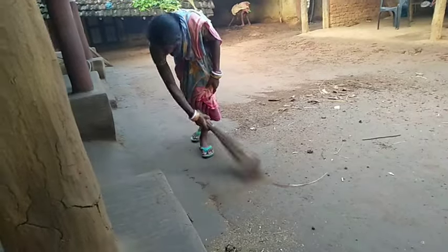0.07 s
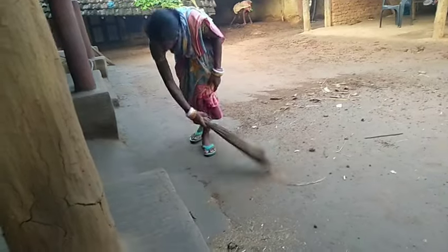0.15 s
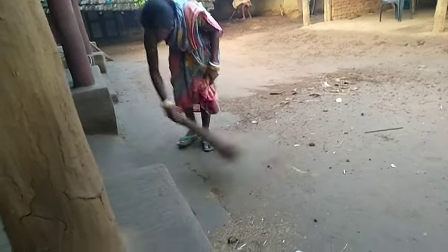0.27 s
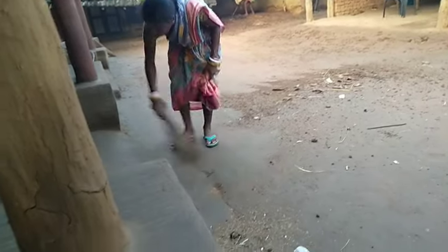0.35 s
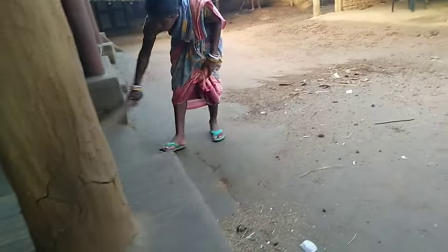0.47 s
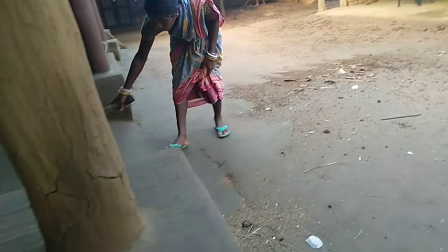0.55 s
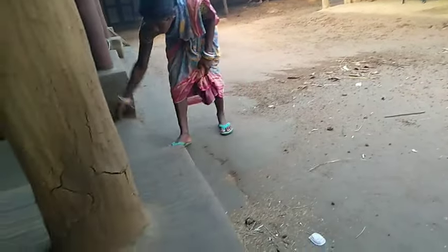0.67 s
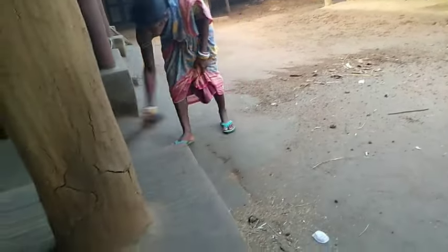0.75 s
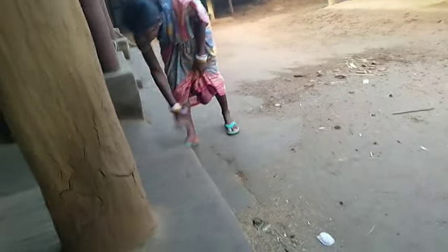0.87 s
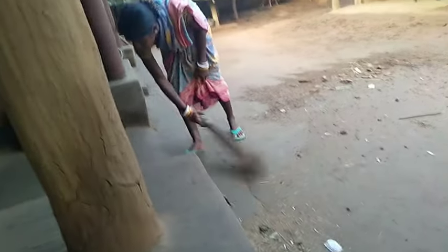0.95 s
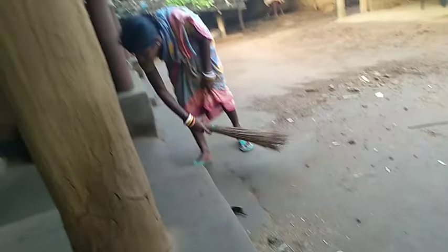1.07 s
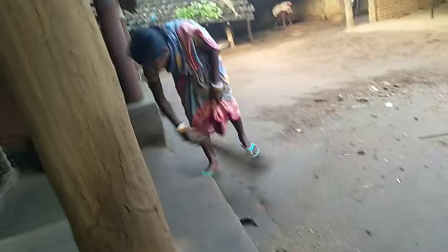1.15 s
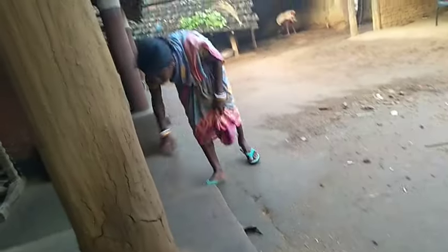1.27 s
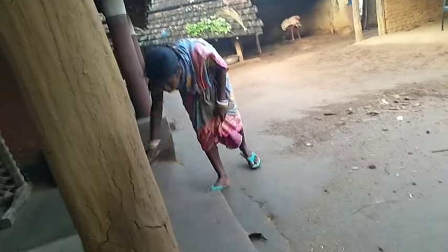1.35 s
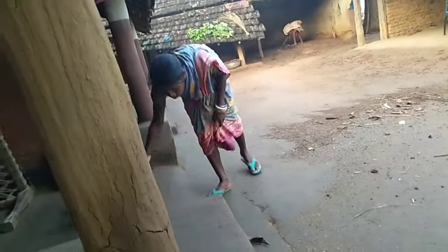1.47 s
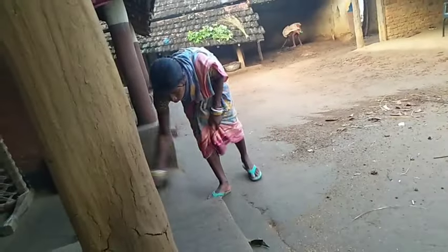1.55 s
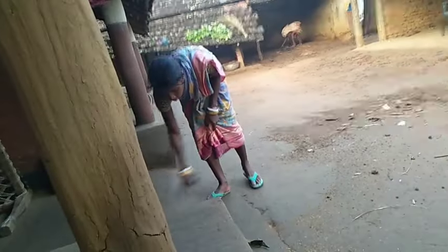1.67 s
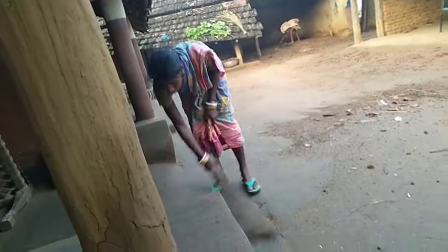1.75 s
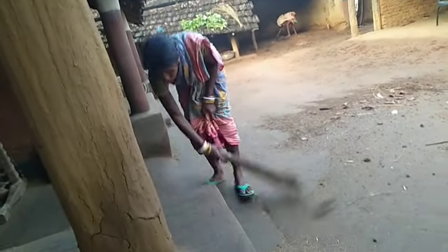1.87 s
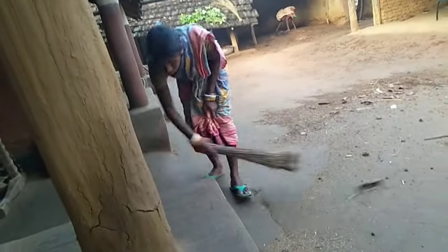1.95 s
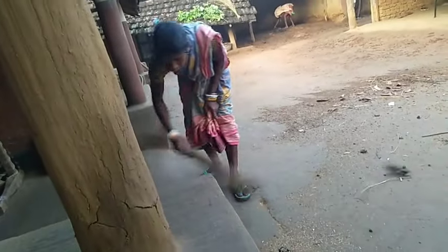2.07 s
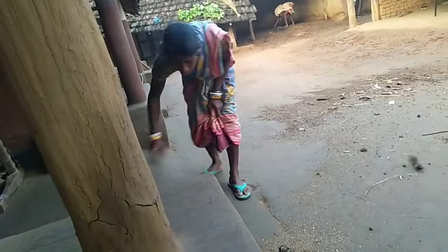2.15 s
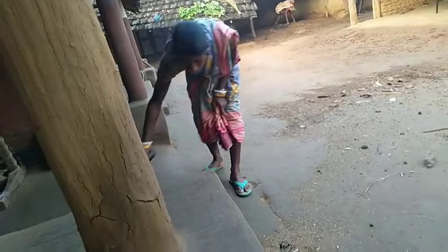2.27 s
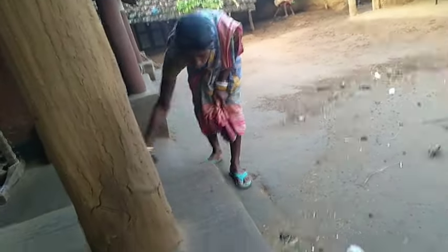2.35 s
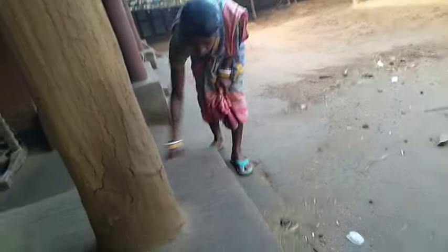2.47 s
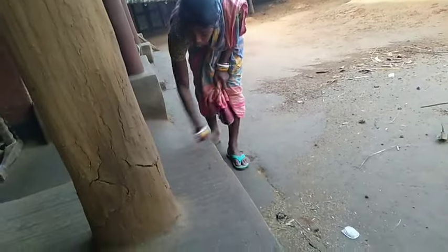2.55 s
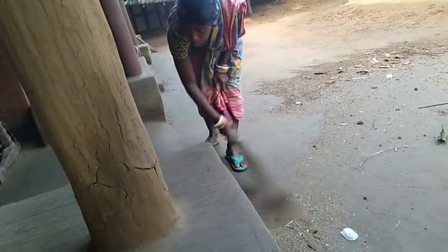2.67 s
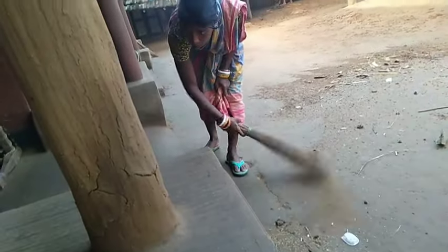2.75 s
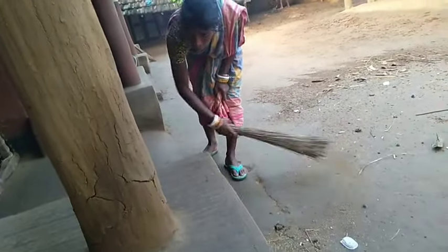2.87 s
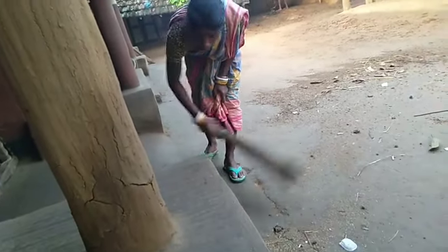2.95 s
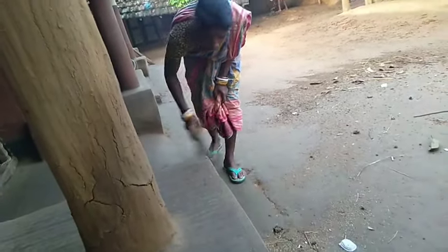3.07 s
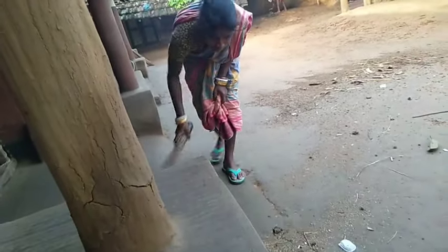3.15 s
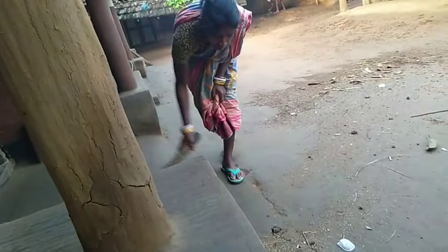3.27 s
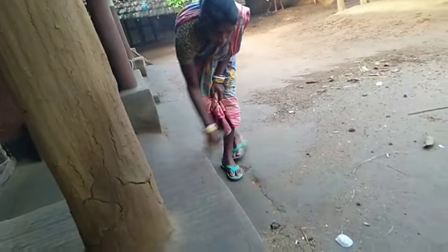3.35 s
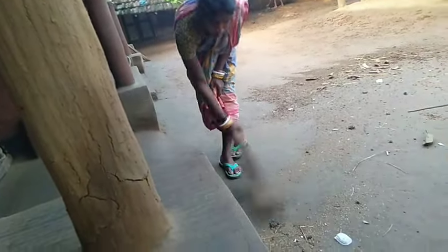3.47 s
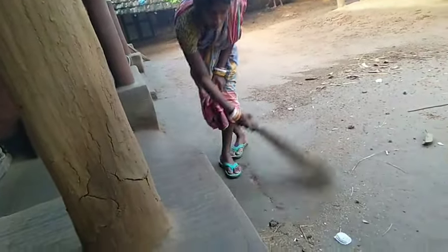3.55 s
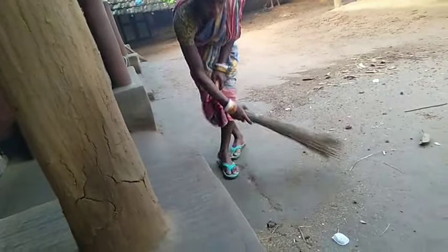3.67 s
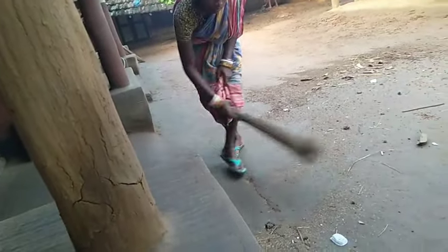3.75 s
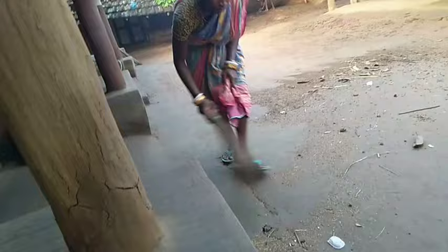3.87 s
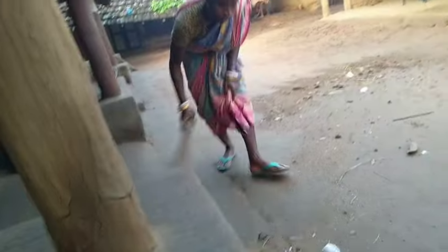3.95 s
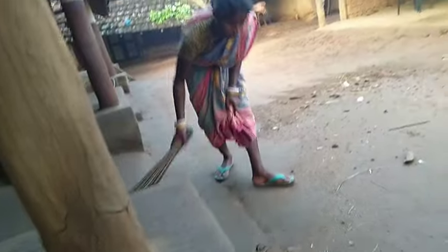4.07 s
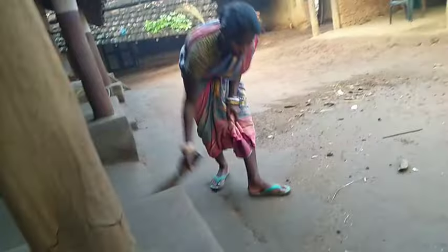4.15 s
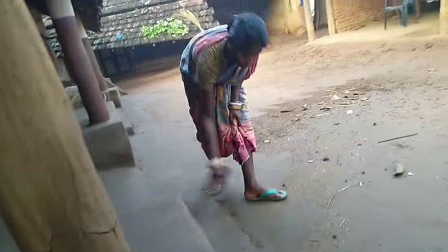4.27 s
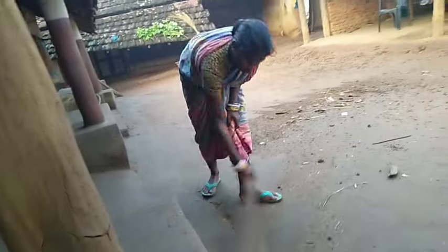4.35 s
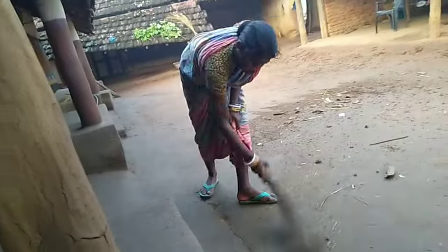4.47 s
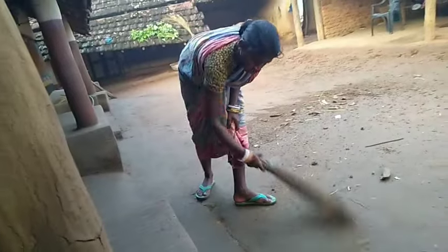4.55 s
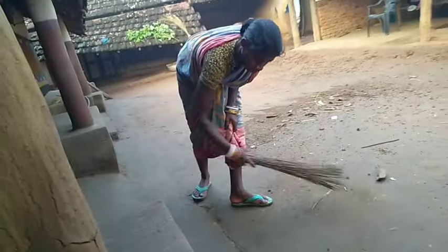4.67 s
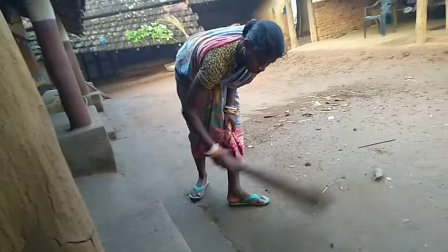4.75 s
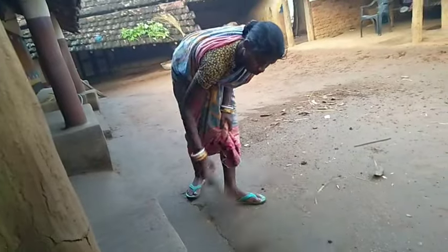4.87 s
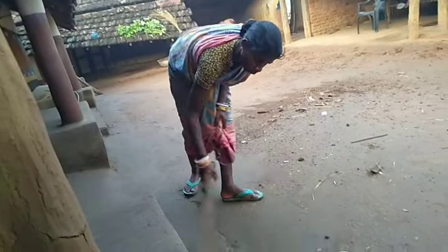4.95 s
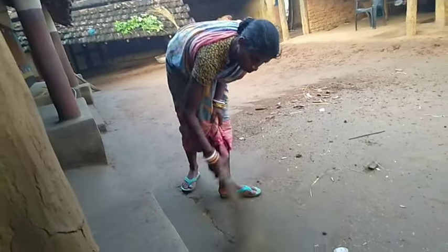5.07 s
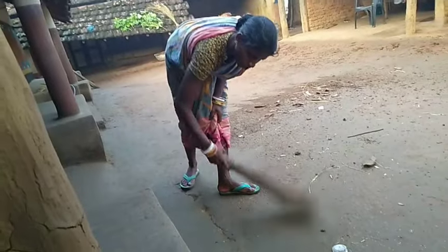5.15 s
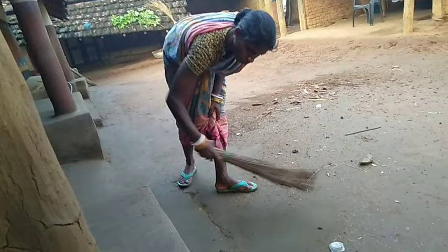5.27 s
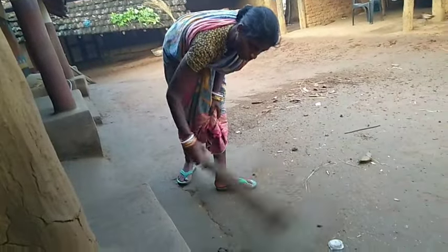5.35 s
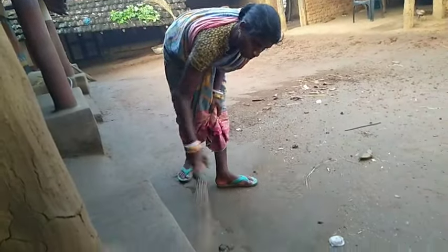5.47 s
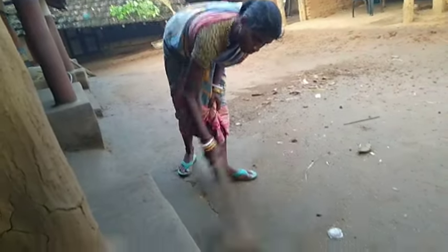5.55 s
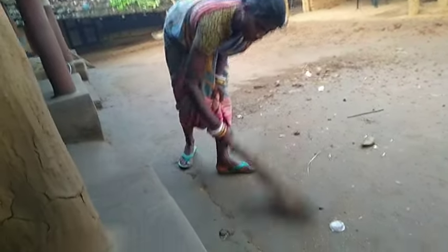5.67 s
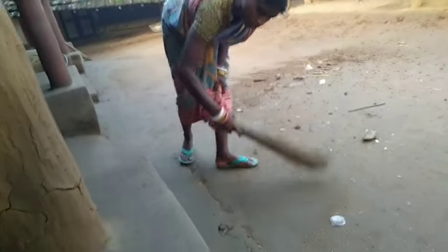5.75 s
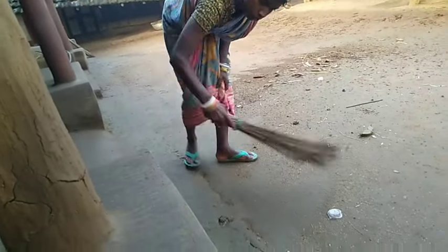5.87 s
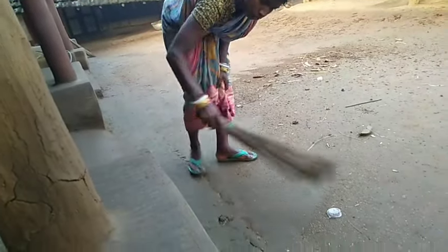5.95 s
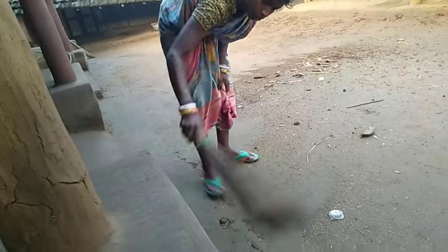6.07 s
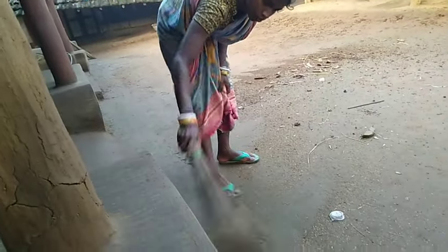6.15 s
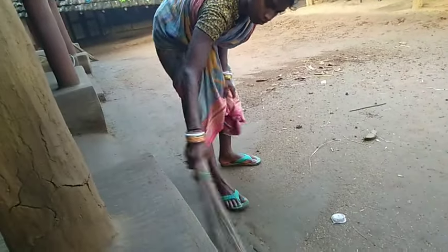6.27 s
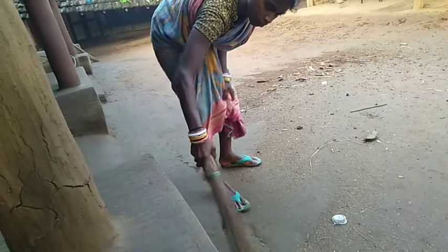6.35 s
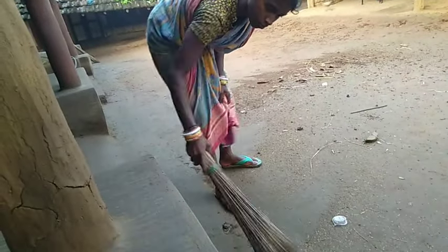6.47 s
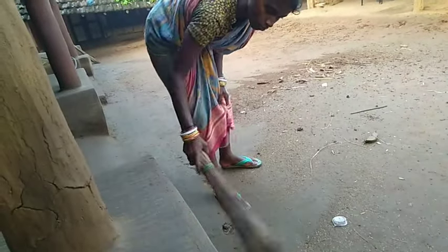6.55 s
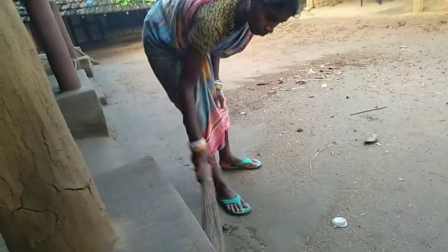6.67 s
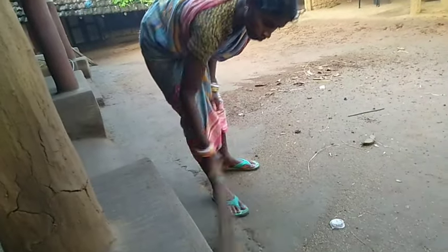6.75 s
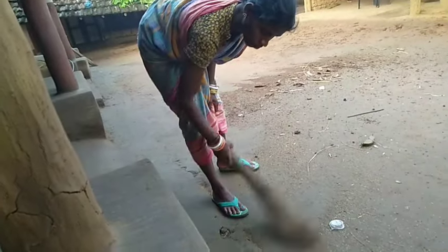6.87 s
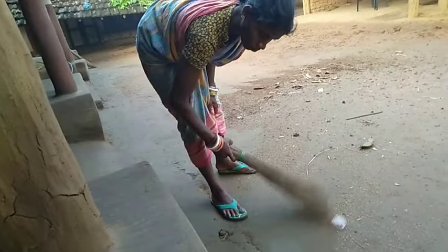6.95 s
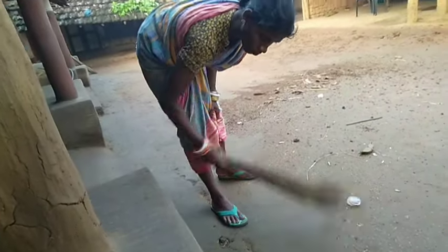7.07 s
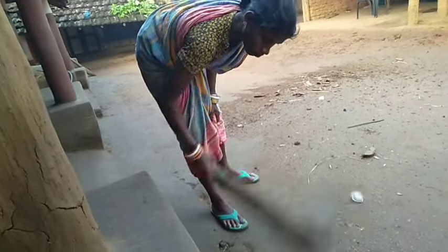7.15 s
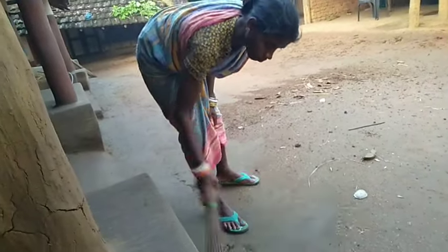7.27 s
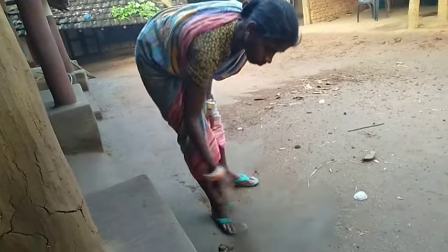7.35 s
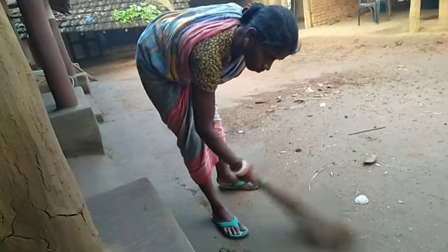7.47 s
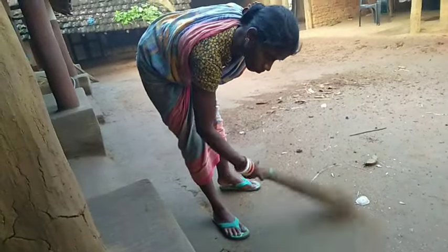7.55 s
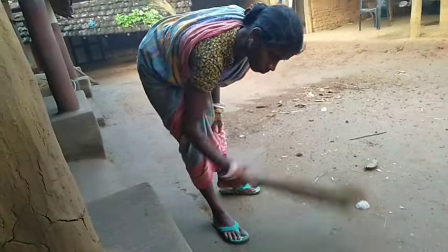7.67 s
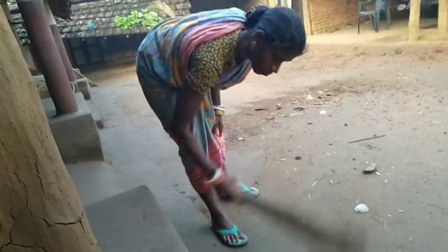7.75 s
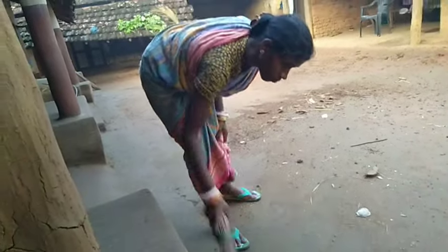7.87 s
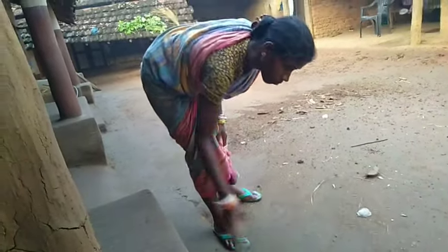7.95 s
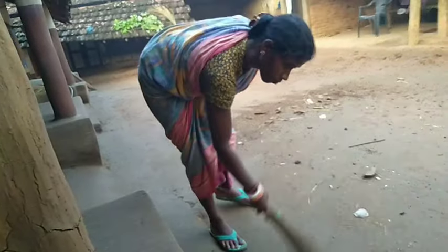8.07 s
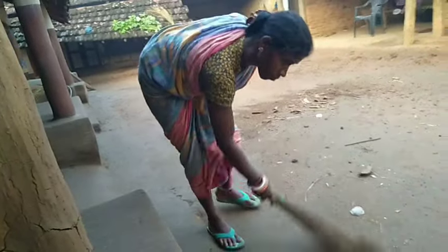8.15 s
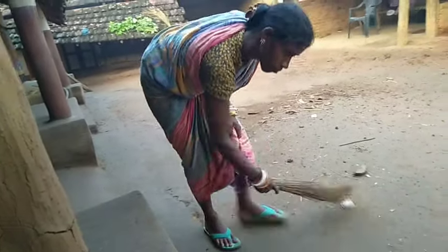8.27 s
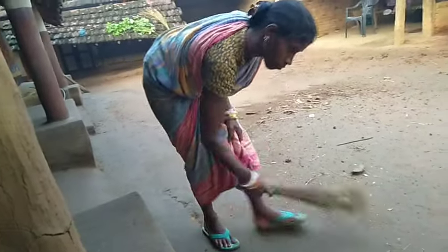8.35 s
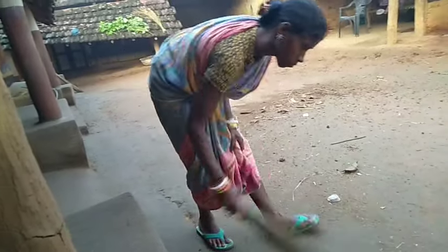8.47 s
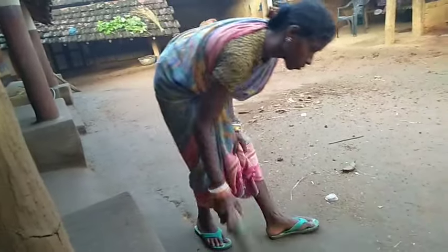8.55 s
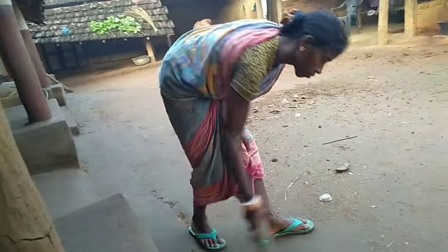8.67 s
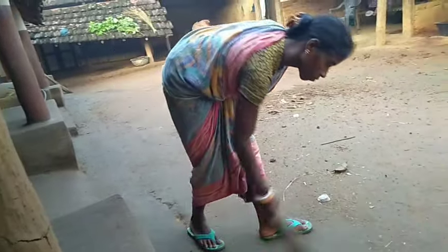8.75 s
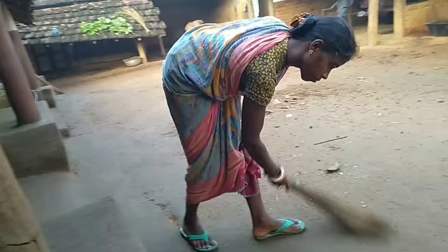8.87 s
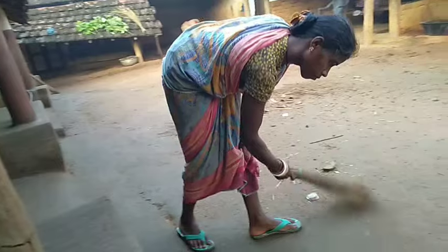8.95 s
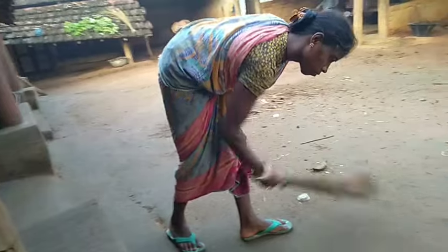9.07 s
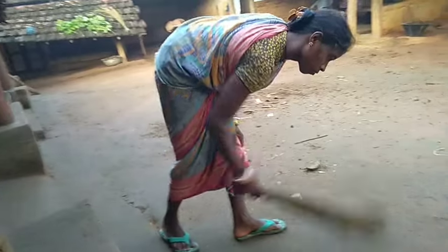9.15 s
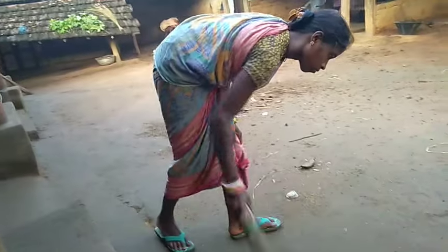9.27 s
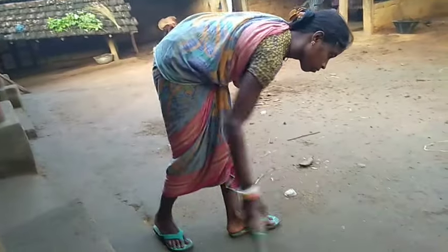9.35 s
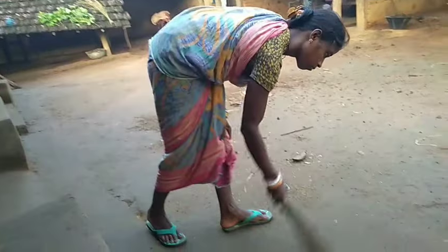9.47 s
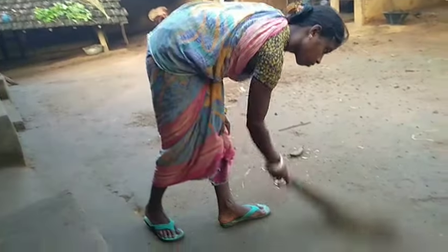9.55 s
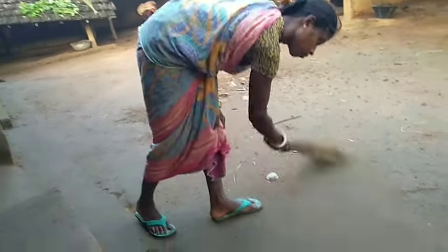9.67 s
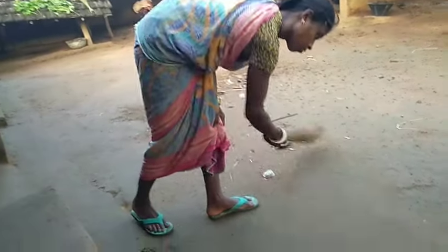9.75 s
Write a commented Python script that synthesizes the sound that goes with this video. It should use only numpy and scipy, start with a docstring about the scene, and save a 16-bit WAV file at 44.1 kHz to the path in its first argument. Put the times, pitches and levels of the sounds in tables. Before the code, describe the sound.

Rhythmic strokes of a bundle broom scrape over gritty earth outdoors, with falling bird whistles early on and a faint far-off motor.

```python
"""A packed-earth yard, swept with a short twig broom: strokes swell and fade as thousands of tips scratch grit,
and twigs sometimes slap or catch. Grit ticks, pebbles knock, something thuds softly. A bird gives five calls,
each a falling whistle ending on a held note, and fainter birds answer; now and then a bangle rings thinly near
3 kHz. Far off a small engine putters under a hiss of air. The sound is nearly mono, with stereo width only in
two treble bands."""
import sys
import numpy as np
from scipy import signal
from scipy.fft import rfft, irfft
from scipy.io import wavfile

SR = 44100
rng = np.random.default_rng(int(sys.argv[2]) if len(sys.argv) > 2 else 0)


def unload_audio(sound):
    """Save the sound as a 16-bit wav file, at the path given as the first command line argument."""
    columns = np.transpose(np.atleast_2d(sound))
    # keep every value between -1 and 1, then stretch to whole-number steps
    steps = np.round(np.clip(columns, -1, 1) * 32767)
    wavfile.write(sys.argv[1], SR, steps.astype(np.int16))


N = 433062
T = np.arange(N) / SR
HZ = np.maximum(np.arange(N // 2 + 1) * SR / N, 1)


def amp(db):
    """Decibels to gain."""
    return 10 ** (np.asarray(db) / 20)


def unit_rms(x):
    """Scale to unit rms."""
    return x / np.sqrt(np.mean(x ** 2) + 1e-20)


def curves(rows):
    """Each column after the first, interpolated linearly in time."""
    times_s, *columns = np.transpose(rows)
    return [np.interp(T, times_s, column) for column in columns]


def response(spectrum):
    """Gain per FFT bin from (Hz, dB) points on a log-frequency axis."""
    hz, db = np.transpose(spectrum)
    return amp(np.interp(np.log(HZ), np.log(hz), db))


def colour(x, spectrum):
    """Filter by (Hz, dB) points."""
    return irfft(rfft(x) * response(spectrum), N)


def drift(rate_hz):
    """Low-passed noise of unit rms."""
    r = np.exp(-2 * np.pi * rate_hz / SR)
    return unit_rms(signal.lfilter([1], [1, -2 * r, r * r], rng.standard_normal(N + SR))[SR:])


def gate(start_s, end_s, fade_s):
    """Window with linear fades."""
    return np.clip(np.minimum(T - start_s, end_s - T) / fade_s, 0, 1)


def ring(rows, t60_s, attack_s):
    """One damped sine per (start s, level dB, pitch Hz) row."""
    out = np.zeros(N)
    for start_s, level_db, hz in rows:
        start = int(start_s * SR)
        t = T[:min(N - start, SR // 2)]
        envelope = amp(level_db - 60 * t / t60_s) * (1 - np.exp(-t / attack_s))
        out[start:start + len(t)] += envelope * np.sin(2 * np.pi * hz * t)
    return out


# Each row: start in seconds, touchdown in seconds, landing level in dB, swell in seconds, peak in dB,
# drag in seconds, loss over the drag in dB, fade on lifting in dB per second, rolling grit in dB,
# low and middle bands in dB relative to the hiss.
STROKES = [(0.0, 0.00089, -25, 0.0086, -27, 0.051, 9, 90, -53.5, -0.5, -1.5),
           (0.699, 0.014, -54.5, 0.23, -33, 0.076, 1.5, 160, -52.5, 0, 1.5),
           (1.56, 0.086, -61.5, 0.23, -34.5, 0.093, -2.5, 232, -50.5, 2, 1.5),
           (2.45, 0.061, -54.5, 0.2, -35.5, 0.12, -0.5, 133, -57.5, 3.5, -1.5),
           (3.33, 0.036, -64.5, 0.15, -34, 0.064, -2.5, 127, -67, 3.5, -0.5),
           (4.23, 0.046, -51, 0.21, -33.5, 0.14, 7.5, 78, -65, 2.5, 0),
           (4.99, 0.0057, -50.5, 0.11, -36, 0.084, 1.5, 205, -57.5, 2.5, 0.5),
           (5.524, .012, -49, 0.17, -35.5, .02, 1.5, 137, -83, 3, 1),
           (6.244, 0.027, -38.5, 0.11, -44, 0.19, 12, 198, -63, 4, 2.5),
           (6.716, 0.011, -55.5, 0.23, -36.5, 0.05, 5, 118, -54, 6, 1.5),
           (7.329, 0.0071, -50.5, 0.19, -33, 0.13, 10, 191, -62, 2.5, 1),
           (7.96, 0.0058, -54.5, 0.2, -32.5, 0.1, 4, 131, -79, 2.5, -0.5),
           (8.729, 0.011, -44.5, 0.12, -31.5, 0.074, 0, 100, -55.5, 2.5, -1),
           (9.4, .02, -63, 0.19, -32.5, 0.062, -2, 117, -49, 4, -0.5)]
# Twigs slap down or catch. Each row: start in seconds, hiss level in dB, rise in seconds.
SLAPS = [(1.035, -33, 0.011), (1.22, -66, 0.018), (2.005, -49, .01), (2.075, -46, 0.013),
         (2.66, -34.5, 0.021), (2.772, -33.5, 0.0048), (4.445, -29.5, 0.016), (4.74, -53, 0.041),
         (4.82, -50, 0.025), (4.993, -36, 0.019), (5.5313, -38.5, 0.016), (6.2567, -42, 0.016),
         (6.42, -40.5, 0.017), (6.49, -45, .006), (6.35, -53, .01), (6.796, -34, 0.014),
         (7.0, -36.5, 0.0052), (7.3404, -39, 0.011), (7.47, -35, 0.0072), (7.9666, -37.5, 0.018),
         (8.3, -43, 0.012), (8.344, -39.5, .006), (8.668, -43.5, 0.03), (9.066, -38.5, 0.0055),
         (9.78, -44.5, 0.014)]


def contact_power():
    """Strokes land, swell, drag and lift; grit rolls on. Returns power of the hiss, low and middle."""
    swell_exponent, grit_fade_db_per_s = 1.74, 29.5
    low_dulling, middle_dulling = 0.25, 0.12   # dB over the hiss per dB under the peak
    bend_db_per_s = 11.5   # the scrape deepens as the twigs bend
    slap_bands_db = [[0], [-2], [-1.5]]
    power = np.full((3, N), 1e-16)
    for (start_s, touch_s, land_db, swell_s, peak_db, drag_s,
         loss_db, lift_db_per_s, grit_db, low_db, middle_db) in STROKES:
        start = int(start_s * SR)
        t = T[start:start + SR] - start_s
        lifted_s = np.maximum(t - swell_s - drag_s, 0)
        level_db = peak_db - (peak_db - land_db) * np.maximum(1 - t / swell_s, 0) ** swell_exponent
        level_db -= loss_db * np.clip((t - swell_s) / drag_s, 0, 1) + lift_db_per_s * lifted_s
        grit = (t > swell_s) * amp(grit_db - grit_fade_db_per_s * lifted_s) ** 2
        hiss = (np.clip(t / touch_s, 1e-3, 1) * amp(level_db)) ** 2 + grit
        under_db = peak_db - 10 * np.log10(hiss)
        low_tilt_db = low_db + low_dulling * under_db + bend_db_per_s * (t - lifted_s - swell_s)
        middle_tilt_db = middle_db + middle_dulling * under_db
        power[:, start:start + SR] += hiss * amp([0 * t, low_tilt_db, middle_tilt_db]) ** 2
    for start_s, level_db, rise_s in SLAPS:
        start = int(start_s * SR)
        rise = T[:min(N - start, SR // 4)] / rise_s
        burst = amp(level_db) * rise * np.exp(1 - rise)
        power[:, start:start + len(burst)] += (burst * amp(slap_bands_db)) ** 2
    return power


# Colour of the sweeping as heard, with bright peaks near 7 and 15 kHz.
# Each row: frequency in Hz, gain in dB.
SWEEP_SPECTRUM = [(150, -59), (250, 7), (595, -16), (1250, -8.5), (1710, -9.5), (1900, -9), (2840, -11.5),
                  (4080, -9), (5390, -12.5), (7360, -3.5), (10800, -11.5), (12000, -9), (14700, 4),
                  (15800, -2.5)]


def broom(tips_per_s, spread_db, flicker_db, twig_db):
    """Dense, random tip contacts hiss; half-octave bands follow the stroke. Returns mid and side."""
    hiss, low, middle = contact_power()
    low_db, middle_db = 10 * np.log10([low / hiss, middle / hiss])
    sizes = amp(spread_db * np.minimum(rng.exponential(1, (2, N)), 4)) * rng.choice([-1, 1], (2, N))
    contacts = rng.random((2, N)) < tips_per_s / SR
    tips = unit_rms(sizes * contacts)
    tips[0] += amp(twig_db) * twigs(plucks_per_s=900, t60_cycles=140)
    spectrum = rfft(tips) * response(SWEEP_SPECTRUM)
    spectrum /= np.sqrt(1 + (850 / HZ) ** 6)   # thin twigs radiate little bass
    spectrum /= np.sqrt(2 * np.sum(np.abs(spectrum[0, HZ > 10000]) ** 2)) / N   # unit rms above 10 kHz
    out, log_anchors = 0, np.log([1500, 7000, 11000])   # low, middle, hiss
    for hz in 250 * 2 ** np.arange(0, 6.5, 0.5):
        band = np.maximum(1 - 2 * np.abs(np.log2(np.minimum(HZ, 16000) / hz)), 0)
        tilt_db = np.interp(np.log(hz), log_anchors, [1, 0, 0]) * low_db
        tilt_db += np.interp(np.log(hz), log_anchors, [0, 1, 0]) * middle_db
        flicker = drift(11.8) + 0.57 * drift(6.6)
        out += irfft(spectrum * band, N) * amp(tilt_db + flicker_db * flicker)
    return out * np.sqrt(hiss)


def twigs(plucks_per_s, t60_cycles, count=36):
    """Twigs are plucked at random; each rings briefly at its own pitch."""
    plucks = (rng.random(N) < plucks_per_s / SR) * rng.standard_normal(N) + 1e-18
    out, plucked_twig = 0, rng.integers(0, count, N)
    for twig, hz in enumerate(np.geomspace(900, 12000, count)):
        r, w = amp(-60 * hz / (t60_cycles * SR)), 2 * np.pi * hz / SR
        drive = plucks * (plucked_twig == twig)
        out += signal.lfilter([np.sin(w)], [1, -2 * r * np.cos(w), r * r], drive) * hz / 4000
    return unit_rms(out)


# Each row: start in seconds, click level before filtering in dB.
GRIT_TICKS = [(3.0644, -51), (3.0958, -47), (3.137, -50), (3.7208, -46), (3.7668, -45), (3.9428, -51),
              (4.108, -45), (4.1713, -51), (4.7485, -44), (4.8708, -41), (4.9522, -40), (5.3177, -40),
              (5.3581, -42), (5.4549, -50), (6.1798, -53), (7.146, -34), (7.187, -32), (7.7981, -41),
              (8.5843, -45), (9.1825, -35), (9.371, -39)]


def grit_ticks(t60_s, rattle, centre_hz, width_hz):
    """Grit ticks off the ground: a bright click, then a short rattle."""
    clicks, t = np.zeros(N), T[:SR // 20]
    for start_s, level_db in GRIT_TICKS:
        click = (t == 0) + rattle * rng.standard_normal(len(t))
        clicks[int(start_s * SR):][:len(t)] += amp(level_db - 60 * t / t60_s) * click
    r, w = np.exp(-np.pi * width_hz / SR), 2 * np.pi * centre_hz / SR
    return signal.lfilter([1, 0, -1], [1, -2 * r * np.cos(w), r * r], clicks) / 2


# Each row: start in seconds, low mode level in dB, its pitch in Hz, upper mode level in dB.
PEBBLE_KNOCKS = [(1.899, -51, 810, -55), (5.68, -58, 420, -53), (7.007, -48, 896, -34.5),
                 (8.31, -42.5, 753, -36), (8.362, -46, 738, -50), (8.453, -60, 740, -71),
                 (9.197, -56, 646, -68)]


def pebbles(upper_hz):
    """A knocked pebble rings in a low mode of its own and a shared upper mode."""
    low = [row[:3] for row in PEBBLE_KNOCKS]
    upper = [(start_s, upper_db, upper_hz) for start_s, _, _, upper_db in PEBBLE_KNOCKS]
    return ring(low, t60_s=0.073, attack_s=0.0011) + ring(upper, t60_s=0.034, attack_s=0.00071)


# Each row: start in seconds, level in dB, pitch in Hz.
THUDS = [(5.688, -53.5, 110.7), (6.343, -60, 124.6), (7.089, -49.5, 119), (8.279, -63, 135.6),
         (9.429, -53.5, 117)]


def thuds():
    """Low tones start softly and ring out."""
    return ring(THUDS, t60_s=0.69, attack_s=0.015)


# Each row: start in seconds, length in seconds, first and settled pitch in Hz, delay to the break in
# seconds, drop there in Hz, sag after it in Hz per second, fundamental, octave and 3/2 partial in dB.
HELD_NOTES = [(0.178, 0.14, 1797, 1778, .035, 29, 903, -48, -48.5, -52),
              (0.678, 0.15, 2040, 1663, 0.17, 5, 100, -40, -55, -50.5),
              (1.403, 0.17, 2160, 1884, 0.082, 80, 1920, -41.5, -54.5, -55),
              (2.347, 0.17, 2014, 1763, 0.1285, 53, 2200, -42.5, -54, -57),
              (3.524, 0.12, 1960, 1940, 0.039, 180, 350, -40, -57, -58)]
# Each row: harmonic number, level in dB relative to the octave.
UPPER_PARTIALS = [(3, -13.5), (4, -11), (6, -20)]


def bird_held_notes(throb, settle_s=0.022, overtone_rise_s=0.027, fade_db_per_s=50):
    """A call's last note settles, throbs and may break downward; period doubling adds a 3/2 partial."""
    break_half_width_s, break_depth = 0.0025, 0.95
    low_throb, high_throb, doubling_throb = 1 + throb * drift(32), 1 + throb * drift(17), drift(87)
    out = np.zeros(N)
    for (start_s, length_s, first_hz, settled_hz, break_s,
         drop_hz, sag_hz_per_s, level_db, octave_db, doubling_db) in HELD_NOTES:
        t = np.clip(T - start_s, 0, length_s)
        hz = settled_hz + (first_hz - settled_hz) * np.exp(-t / settle_s)
        hz -= (t > break_s) * (drop_hz + sag_hz_per_s * (t - break_s))
        phase = 2 * np.pi * np.cumsum(hz) / SR
        overtones = np.sin(2 * phase) + sum(amp(db) * np.sin(k * phase) for k, db in UPPER_PARTIALS)
        note = low_throb * amp(level_db) * np.sin(phase)
        note += high_throb * amp(octave_db) * overtones * np.minimum(t / overtone_rise_s, 1) ** 2
        note += doubling_throb * amp(doubling_db) * np.sin(1.5 * phase)
        dip = 1 - break_depth * np.exp(-((t - break_s) / break_half_width_s) ** 2)
        out += gate(start_s, start_s + length_s, fade_s=0.009) * amp(-fade_db_per_s * t) * dip * note
    return np.sqrt(2) * out


# One list per call. Each row: time in seconds, pitch in Hz, level in dB.
CALL_GLIDES = [
    [(0.06, 4750, -50), (0.084, 4680, -46), (0.106, 3850, -44.5), (0.174, 2710, -44.5), (0.19, 2120, -39)],
    [(0.575, 5100, -52), (0.597, 4760, -43), (0.613, 4050, -32), (0.63, 3750, -33), (0.655, 3050, -41.5),
     (0.668, 2900, -40), (0.674, 2400, -46), (0.695, 2300, -45)],
    [(1.29, 4900, -51), (1.315, 4600, -49), (1.336, 3750, -39), (1.352, 3480, -37.5), (1.37, 2980, -37.5),
     (1.392, 2850, -38), (1.404, 2460, -42), (1.45, 2330, -32)],
    [(2.236, 4850, -55), (2.262, 4620, -49), (2.278, 3900, -39), (2.305, 3450, -41.5), (2.345, 2880, -54),
     (2.353, 2380, -38), (2.372, 2300, -39.5)],
    [(3.365, 4400, -66), (3.397, 3820, -39), (3.415, 3620, -51), (3.46, 3400, -44), (3.49, 3350, -59),
     (3.515, 2460, -44), (3.54, 2340, -34.5)],
]


def bird_glides(rasp):
    """Each call opens with a raspy, unsteady whistle that falls in steps."""
    return whistle(CALL_GLIDES, wobble=0.012, flutter=0.8 + rasp * drift(160), step_reach=0.035)


# Pitches in Hz at which a glide lingers.
STEPS_HZ = [2380, 3010, 3440, 3926]


def stepped(hz, reach):
    """Within a fraction `reach` of each step the pitch moves four times slower."""
    steps_hz = np.array([0, *STEPS_HZ, SR])
    edges_hz = np.outer(steps_hz, [1 - reach, 1 + reach])
    flats_hz = np.outer(steps_hz, [1 - reach / 4, 1 + reach / 4])
    return np.interp(hz, edges_hz.ravel(), flats_hz.ravel())


def whistle(glides, wobble, flutter, step_reach=0, octave_db=-36, twelfth_db=-31):
    """A near-pure tone follows each glide; it breaks up where the flutter gain crosses zero."""
    out, detune = np.zeros(N), 1 + wobble * drift(123)
    for rows in glides:
        hz, level_db = curves(rows)
        phase = 2 * np.pi * np.cumsum(stepped(hz, step_reach) * detune) / SR
        tone = np.sin(phase) + amp(octave_db) * np.sin(2 * phase) + amp(twelfth_db) * np.sin(3 * phase)
        out += gate(rows[0][0], rows[-1][0], fade_s=0.0028) * amp(level_db) * tone
    return np.sqrt(2) * flutter * out


def peeps(rows, rise_share=0.22, edge_db=-7):
    """Straight glides that swell and fade, as rows for whistle()."""
    return [[(start_s, first_hz, db + edge_db),
             (start_s + rise_share * length_s, first_hz + rise_share * (last_hz - first_hz), db),
             (start_s + length_s, last_hz, db + edge_db)]
            for start_s, length_s, first_hz, last_hz, db in rows]


# Each row, in both: start in seconds, length in seconds, first and last pitch in Hz, level in dB. # The second
# holds a faint chirp near 4 s and the thin, steady rings of a bangle.
FAR_CLUCKS = [(2.06, .18, 3750, 3700, -63), (2.055, 0.1, 890, 930, -59), (2.195, .12, 920, 988, -59)]
THIN_TONES = [(3.96, 0.13, 3360, 3100, -73), (4.032, .04, 2500, 2400, -67.5),
              (4.955, 0.083, 2950, 2890, -65), (7.86, 0.23, 3130, 3240, -77),
              (8.51, 0.1, 3160, 3150, -78)]


def faint_tones():
    """Hoarse clucks, broken up by fast flutter, and thin, steadier tones: a faint chirp and a ringing bangle."""
    clucks = whistle(peeps(FAR_CLUCKS), wobble=0.03, flutter=drift(190))
    return clucks + whistle(peeps(THIN_TONES), wobble=0.0019, flutter=1 + 0.29 * drift(30))


# Each row: time in seconds, firings per second.
FIRING_RATE = [(0, 24.4), (.85, 24.9), (1.0, 18.6), (2.1, 20.3), (3.2, 17.7), (3.8, 19.2), (4.9, 15.0),
               (5.2, 15.3), (5.55, 18.4), (7.25, 18.6), (7.5, 21.6), (9.82, 21.8)]
# The engine moves behind walls and away. Each row, in both: time in seconds, level in dB.
EXHAUST_LEVEL = [(0.0, -61.5), (0.87, -61), (1.09, -64.5), (1.78, -62.5), (2.4, -67), (3.8, -60),
                 (4.21, -63.5), (4.4, -62.5), (5.33, -60), (5.72, -55.5), (5.87, -64), (7.25, -68.5),
                 (7.52, -61), (7.9, -65), (8.15, -92)]
RUMBLE_LEVEL = [(0.0, -60), (2.4, -58.5), (3.8, -63.5), (5.7, -61), (6.0, -64.5), (8.1, -64.5), (9.82, -69)]
# Each row, in both: frequency in Hz, gain in dB.
EXHAUST_SPECTRUM = [(15, -30), (40, -26), (60, -25), (100, 1.5), (160, 10), (200, 3.5), (260, -20),
                    (400, -24), (800, -70)]
RUMBLE_SPECTRUM = [(12, -37), (25, -13), (52, -2), (90, -9), (180, -11), (300, -20), (500, -50)]


def engine(uneven_db):
    """One uneven puff per firing, coloured by pipe and distance, over a deeper rumble."""
    (firing_hz,) = curves(FIRING_RATE)
    (exhaust_db,), (rumble_db,) = curves(EXHAUST_LEVEL), curves(RUMBLE_LEVEL)
    firings = np.diff(np.floor(np.cumsum(firing_hz) / SR), prepend=0)
    puffs = firings * amp(uneven_db * rng.standard_normal(N))
    blend_rad = 2.2 * T + 0.6 * drift(0.5)   # the echoes change as the engine moves
    blurred = np.cos(blend_rad) * yard(puffs, t60_s=0.25, wet_db=0)
    blurred += np.sin(blend_rad) * yard(puffs, t60_s=0.3, wet_db=3)
    exhaust = unit_rms(colour(blurred, EXHAUST_SPECTRUM))
    rumble = unit_rms(colour(rng.standard_normal(N), RUMBLE_SPECTRUM))
    return amp(exhaust_db) * exhaust + amp(rumble_db) * rumble


# Each row: frequency in Hz, gain in dB.
AIR_SPECTRUM = [(150, -36), (250, -8), (386, -0.5), (649, -0.5), (1250, -6), (1870, -8), (3940, -11.5),
                (4940, -3.5), (6090, -12.5), (8320, 4.5), (9720, -12), (10800, -13), (12600, -9),
                (15000, -6), (15800, -1)]


def air(level_db, waver_db):
    """A faint, wavering hiss. Returns mid and side."""
    gain = amp(level_db + waver_db * drift(6.1))
    return gain * unit_rms(colour(rng.standard_normal((2, N)), AIR_SPECTRUM))


def yard(x, t60_s, wet_db):
    """Walls and porch add a diffuse tail."""
    t = T[:SR // 2]
    tail = rng.standard_normal(len(t)) * amp(-60 * t / t60_s) * (t > 0.004)
    return x + amp(wet_db) * signal.fftconvolve(x, tail / np.linalg.norm(tail))[:N]


# Stereo width in two treble bands. Each row: frequency in Hz, side gain in dB.
SIDE_SPECTRUM = [(300, -68), (3900, -63), (4300, -3.5), (6800, -8), (7400, -48), (8600, -31), (9500, -0.5),
                 (12500, -6), (13500, -41)]


def scene():
    """Left and right from mid and side; only broom and air reach the side."""
    sweep, sweep_side = broom(tips_per_s=12000, spread_db=-0.5, flicker_db=2, twig_db=-12.5)
    ground = grit_ticks(t60_s=0.022, rattle=0.4, centre_hz=11000, width_hz=5000)
    ground += pebbles(upper_hz=2030) + thuds()
    birds = bird_held_notes(throb=0.55) + bird_glides(rasp=0.45) + faint_tones()
    air_mid, air_side = air(level_db=-58.5, waver_db=1.6)
    mid = yard(sweep + ground, t60_s=0.14, wet_db=-12) + yard(birds, t60_s=0.35, wet_db=-6.5)
    mid += air_mid + engine(uneven_db=2)
    side = colour(sweep_side + air_side, SIDE_SPECTRUM)
    return np.array([mid + side, mid - side])


def record(dry, cutoff_hz=15780):
    """A steep low-pass cuts the top."""
    return signal.sosfilt(signal.ellip(12, 0.5, 80, cutoff_hz, fs=SR, output="sos"), dry)


dry = scene()
out = record(dry)
unload_audio(out)
```